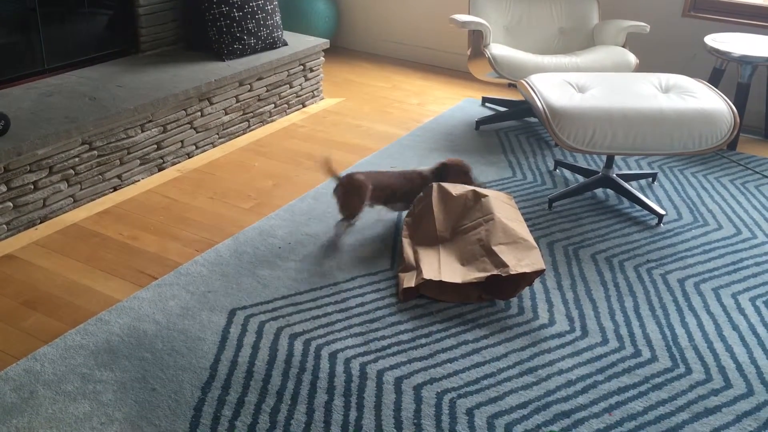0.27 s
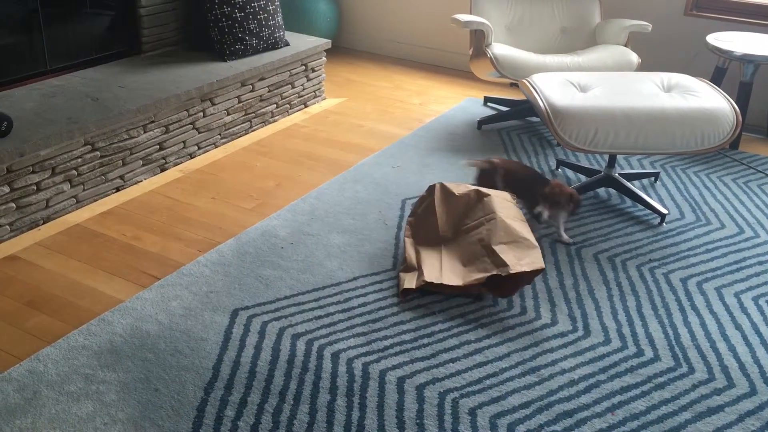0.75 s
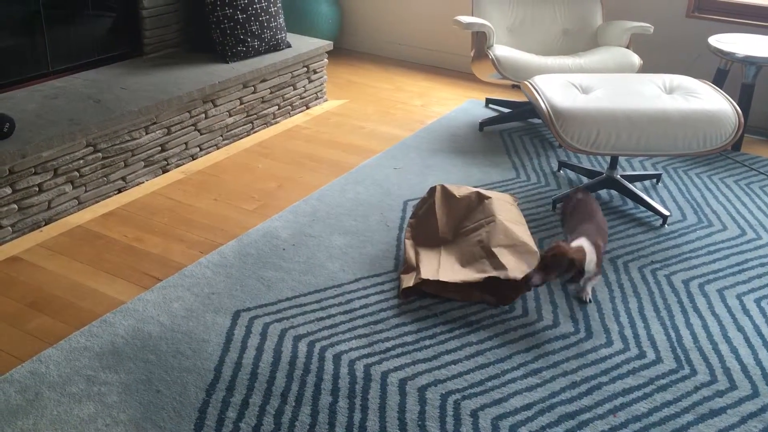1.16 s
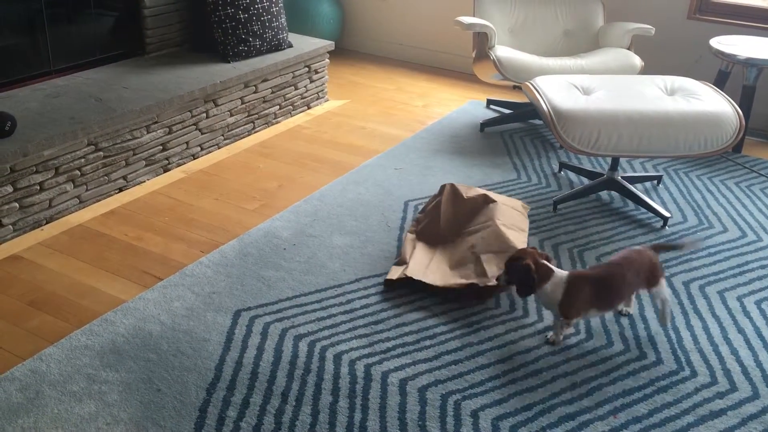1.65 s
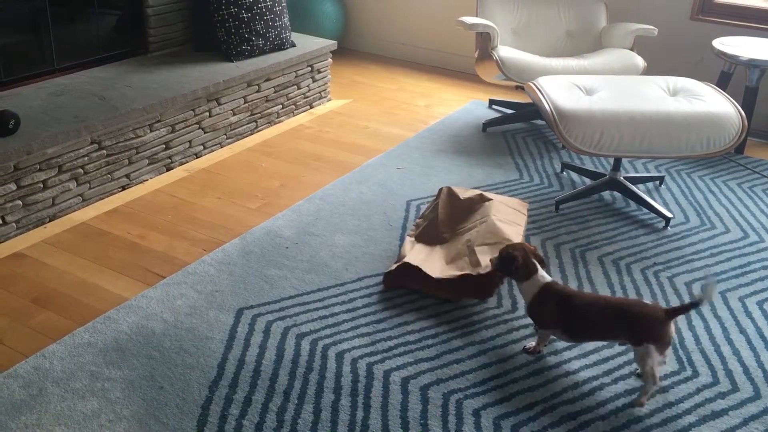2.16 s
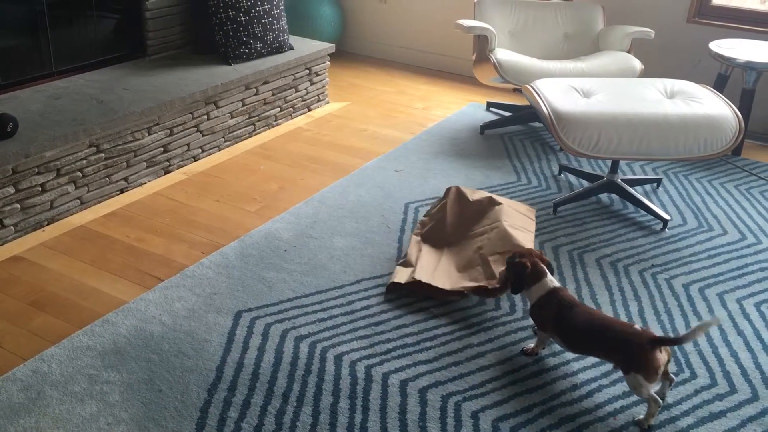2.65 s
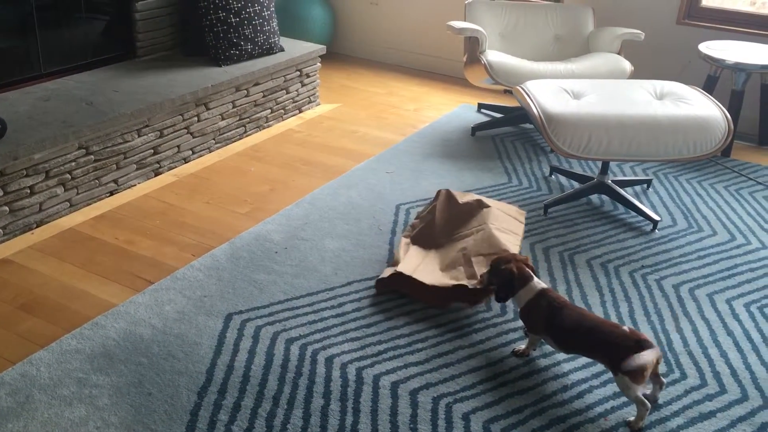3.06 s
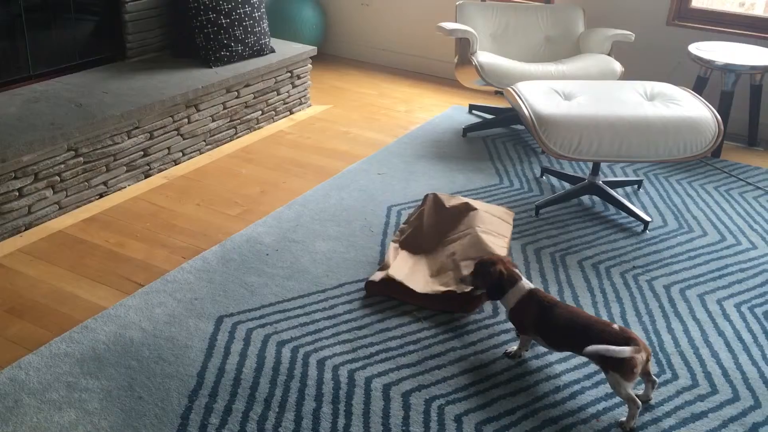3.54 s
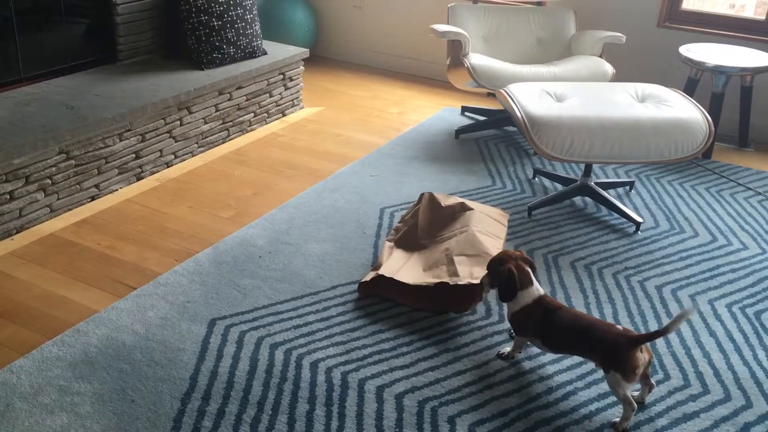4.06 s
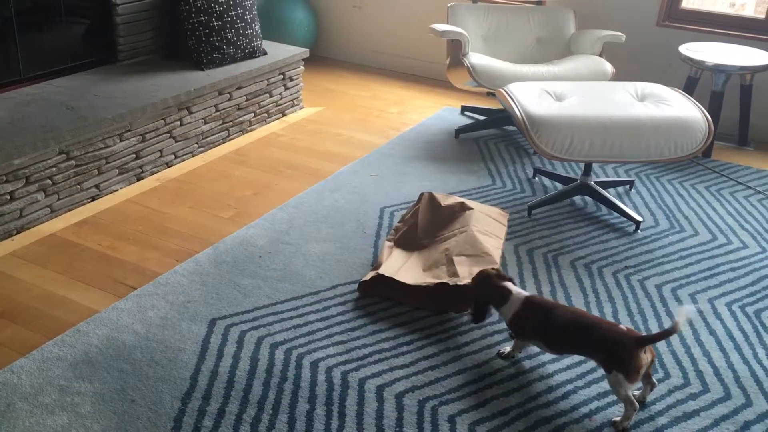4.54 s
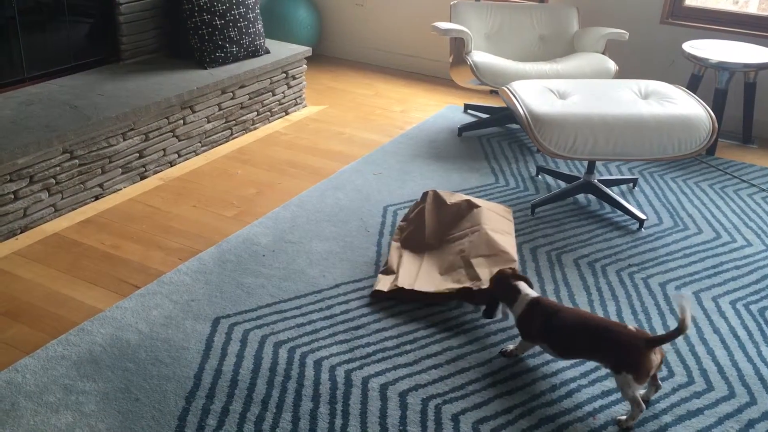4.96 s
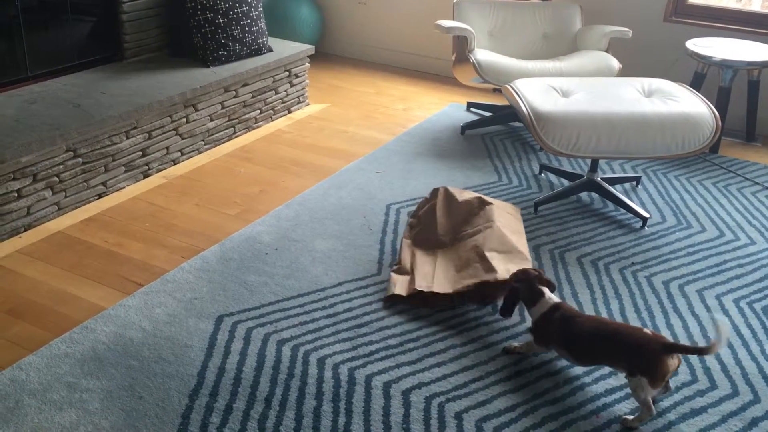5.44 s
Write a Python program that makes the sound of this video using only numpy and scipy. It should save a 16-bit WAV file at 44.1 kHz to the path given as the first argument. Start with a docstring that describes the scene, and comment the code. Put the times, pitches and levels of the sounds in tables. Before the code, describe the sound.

A quiet, resonant living room heard through one microphone a few metres away, with faint low room tone and the dying ring of an earlier yap. From 0.1 to 0.4 s a puppy gives tiny nose whistles and soft panting puffs, with a small paper tick at 0.2. At 0.4 s comes one piercing yap, about a tenth of a second, nearly a pure squeal around 1.9 kHz, roughening and dropping at its end; its echo lasts over a second. Soft paw scuffs follow, then a thin rising nasal whistle and sniff at 1.1-1.2 s. Paper snaps sharply at 1.25 and 1.43, then crinkles, rustles and pops irregularly from 1.8 to 3.5, brighter and busier near 3.3-3.45, over dull floor bumps. It nearly rests from 3.7 to 4.6 s. A thump and light crackle come at 4.7, rustling at 5.1, then the loudest crisp crunches at 5.33 and 5.57 s.

```python
"""Puppy and paper bag

A puppy pants, yaps once, scuffs along, whistles and sniffs, then nudges and bites a paper bag on a rug.
The yap is a stack of partials, the whistles are gliding tones; panting, scuffs and rustle are shaped noise.
Snapping creases are short bursts that ring the paper; bumps on the floor are swells of low noise.
The large hard-walled living room rings for over a second; the tail of an earlier yap is dying away."""
import sys
import numpy as np
from scipy import signal
from scipy.fft import rfft, irfft, next_fast_len
from scipy.io import wavfile
from scipy.ndimage import uniform_filter1d

SR = 44100
rng = np.random.default_rng(int(sys.argv[2]) if len(sys.argv) > 2 else 0)


def wav_record(signal):
    """Record a signal, one row per channel, as 16-bit PCM in the file named by sys.argv[1]."""
    frames = np.transpose(np.atleast_2d(signal))
    bounded = np.clip(frames, -1, 1)
    # unit amplitude maps onto the largest positive 16-bit level
    quanta = np.round(bounded * 32767).astype(np.int16)
    wavfile.write(sys.argv[1], SR, quanta)


def rack_gain(trim_db):
    """Turn a fader trim in dB into the linear factor to multiply a signal by."""
    fader = np.asarray(trim_db, float)
    return 10 ** (fader / 20)


N = 251357
TIME = np.arange(N) / SR

# Partials of a past yap still ringing. Each row: pitch in Hz, width in Hz, level at the start in dB.
RINGING_PARTIALS = [(1830, 90, -64), (890, 130, -60.5), (1680, 57, -57)]
# Spectrum of the quiet room. Each row: frequency in Hz, relative density in dB per Hz.
AIR_SPECTRUM = [(15, -43.5), (25, -19), (43, -3), (92, -5.5), (127, -2), (185, -37), (301, -16),
                (451, -19.5), (2480, -33.5), (2840, -32), (10400, -38.5), (12500, -38), (16000, -35.5)]
# Paws and bag bumping the floor. Each row: peak time in seconds, level in dB, time to rise 15 dB in seconds,
# extra level of the deep boom of the boards in dB.
FLOOR_BUMPS = [(0.279, -57, 0.29, 14), (0.719, -53.5, 0.35, 7), (1.289, -50, 0.052, 0.5),
               (1.55, -53, 0.57, -5), (1.81, -44, 0.022, -5), (2.2, -50.5, 0.14, -2),
               (2.5, -49, 0.075, -14), (3.02, -55, 0.26, 8.5), (3.3, -51.5, 0.23, -5), (3.6, -60, 0.11, 14),
               (4.055, -60, 0.017, -11), (4.731, -43.5, 0.015, -1.5), (5.15, -51, .1, -5.5),
               (5.345, -47, 0.091, -1), (5.619, -47, 0.13, -7)]
# Spectrum of a floor bump. Each row: frequency in Hz, relative density in dB per Hz.
THUD_SPECTRUM = [(18, -26), (30, -19), (49, 8.5), (86, 7.5), (123, 7.5), (281, 8.5), (500, -14.5),
                 (650, -34), (1100, -120)]
# Nose whistles. Each row: start in seconds, length in seconds, starting pitch in Hz, glide in Hz per second,
# fundamental level in dB, octave level in dB.
NOSE_WHISTLES = [(0.103, .06, 5120, -500, -69.5, -58.5), (0.214, .012, 5800, -60000, -51, -61.5),
                 (.222, .03, 4850, -2000, -67.5, -53.5), (1.1, 0.048, 4980, 10987, -46.5, -62),
                 (1.152, 0.039, 5560, -1000, -53.5, -35.5), (1.174, 0.047, 5940, -33000, -51.5, -45)]
# Breath before the yap. Each row: time in seconds, level in dB.
PANT_CONTOUR = [(.12, -76.5), (.17, -61), (.22, -50), (.3, -65), (.36, -65), (.4, -49.5), (.41, -82)]
# Colour of breath through the open mouth. Each row: frequency in Hz, relative density in dB per Hz.
MOUTH_SPECTRUM = [(290, -41.5), (500, -11.5), (665, -22.5), (859, -15.5), (1650, -5.5), (4350, -22.5),
                  (5310, -12), (7360, -38.5), (9790, -17.5), (15000, -37.5)]
# Creases snapping. Each row: time in seconds, peak of the crack in dB, panel pitch in Hz,
# treble lift from 6 kHz up in dB, decay time of the crackle in ms.
CREASE_SNAPS = [(0.2142, -35, 1660, 8, 4.4), (1.2504, -26, 2083, 3, 1.9), (1.2609, -34, 2030, 6, 8.9),
                (1.4339, -27.5, 1680, -5.5, 2.6), (1.7609, -34.5, 1170, -23, 4.6),
                (1.8028, -29, 1260, 1, 6.8), (1.8138, -27, 407, -14, 4.75), (1.8386, -34, 1070, 1, 5.6),
                (2.084, -34.5, 676, -6.5, 6), (2.1621, -32.5, 1330, -2, 5.3), (2.204, -30, 810, 6.5, 4.1),
                (2.3805, -35.5, 727, -2.5, 6.5), (2.4447, -38, 810, -11, 4.8),
                (2.4716, -32.5, 1470, 1, 6.7), (2.514, -26.5, 1260, 2.5, 3.43),
                (2.5261, -32.5, 1800, 3, 5.4), (2.7209, -32, 1800, 5, 4.9), (2.734, -34.5, 1080, -5, 4.4),
                (2.751, -33, 900, -5, 5.5), (2.802, -35, 1390, -11, 2.9), (2.9401, -29, 1250, 2.5, 6.6),
                (2.9886, -35.5, 1960, 6, 4), (3.0469, -34, 910, -6.5, 7.2), (3.1092, -31, 1164, 1, 4.7),
                (3.1377, -34.5, 1210, -1, 4.7), (3.2582, -35.5, 1300, -4, 7.6),
                (3.2912, -32.5, 1460, 24, 2.3), (3.3136, -36, 5830, 23.5, 1.8),
                (3.3633, -27.5, 1290, 19, 2.4), (3.373, -35, 1290, 16, 2.1), (3.426, -24.5, 1350, 1, 2.3),
                (3.4518, -35, 1200, 10, 3.2), (3.6993, -36, 1750, 4, 3.4), (4.6769, -42.5, 630, -18, 5.5),
                (4.722, -34.5, 720, -32, 8.7), (4.7509, -39, 1196, 21.5, 4.2), (4.8099, -36, 738, 18, 4.1),
                (5.0813, -36, 845, -6, 8.4), (5.1256, -38, 1010, 0, 4.3), (5.151, -33.5, 1160, -21, 10.3),
                (5.219, -39.5, 1680, 22, 9.1), (5.3214, -28.5, 644, -8, 10.6),
                (5.3314, -23.5, 955, 11.5, 5.1), (5.3474, -28.5, 1000, 10, 3.4),
                (5.4386, -29, 1130, 8, 2.4), (5.5562, -27, 3440, 25, 12), (5.5744, -23, 1820, 2, 4.3),
                (5.5957, -25.5, 840, 4.5, 7.9)]
# Colour of the paper. Each row: frequency in Hz, relative density in dB per Hz.
PAPER_SPECTRUM = [(88, -29), (150, -4.5), (328, -4.5), (439, -4.5), (1260, -6.5), (2650, -11.5),
                  (3220, -5.5), (4760, -13.5), (6020, -14.5), (13400, -30.5), (16000, -31)]
# Resonances of the air inside the bag. Each row: frequency in Hz, width in Hz, relative level in dB.
BAG_HOLLOW = [(321, 32, 2), (130, 12, -1)]
# The yap's course. Each row: time in seconds, pitch in Hz, effort (its level) in dB.
YAP_CONTOUR = [(.403, 1830, -38.5), (.407, 1804, -15.5), (.413, 1890, -9), (.43, 1907, -7),
               (.445, 1903, -5.5), (.456, 1990, -8), (.47, 1974, -16), (.48, 2008, -17.5),
               (.488, 1767, -19), (.505, 1650, -51.5)]
# Level of the yap's partials by frequency. Each row: frequency in Hz, gain in dB.
THROAT_GAIN = [(900, -5), (1900, -1), (2850, -14.5), (3800, -13), (5700, -27.5), (7600, -53), (9500, -38),
               (11400, -43), (13300, -43)]
# Soft scuffing of running paws, a short sniff, then the bag nudged, dragged or bitten.
# Each row: start of full level in seconds, hold in seconds, level in dB before the rustle's common lift,
# brightness in dB per octave.
SCUFFS_AND_NUDGES = [(0.518, .33, -70, -2.5), (1.112, .04, -64, 1), (1.161, 0.12, -56, 1.5),
                     (1.336, 0.16, -59.5, 5), (1.556, .18, -59.5, 1), (1.808, 0.089, -57.5, 0),
                     (2.06, 0.034, -65.5, 3), (2.164, 0.041, -55.5, 0.5), (2.45, 0.033, -60.5, -2.5),
                     (2.53, 0.028, -54.5, 0), (2.674, .06, -59, 3.5), (2.917, .2, -61.5, -2),
                     (3.29, 0.177, -55.5, 0.5), (3.601, .12, -68.5, -3), (4.583, .14, -69.5, 1.5),
                     (4.746, 0.086, -58.5, 0), (5.051, .05, -67, 2), (5.136, 0.17, -59.5, 2),
                     (5.333, 0.024, -50.5, -0.5), (5.42, .03, -86, -1), (5.566, 0.024, -50.5, 1),
                     (5.63, 0.085, -57, 4)]
# Echo by band. Each row: frequency in Hz, time to die by 60 dB in seconds,
# echo level in dB before each source's own echo setting.
ROOM_BANDS = [(101.4, 0.29, -1), (300, 1.3, 1), (859, 1.41, -0.5), (1960, 1.426, 1), (3626, 0.97, -8),
              (6600, 0.84, -9.5), (11000, 1.3, -15)]


def evened(x):
    """Scales to rms 1."""
    return x / np.sqrt(np.mean(x ** 2) + 1e-20)


def read(points, hz):
    """Looks a spectrum up on a log-frequency axis."""
    f, value = np.transpose(points)
    return np.interp(np.log(hz + 1), np.log(f + 1), value)


def add(mix, s, sound):
    """Mixes a sound in at s seconds."""
    part = mix[round(s * SR):][:len(sound)]
    part += sound[:len(part)]


def coloured(x, points):
    """Filters by a spectrum given in dB."""
    size = next_fast_len(len(x))
    gain = rack_gain(read(points, np.fft.rfftfreq(size, 1 / SR)))
    return irfft(rfft(x, size) * gain, size)[:len(x)]


def unfold(rows):
    """Time and columns of a table, sample by sample."""
    s, *columns = np.transpose(rows)
    t = np.arange(s[0], s[-1], 1 / SR)
    return [t] + [np.interp(t, s, c) for c in columns]


def ring(x, hz, width):
    """One resonance of peak gain 1."""
    return signal.lfilter(*signal.iirpeak(hz, hz / width, SR), x)


def swell(t, start, hold, rise_db_per_s, fall_db_per_s):
    """Gain that rises to 1 at start, holds, and falls, straight in dB."""
    before = np.maximum(start - t, 0)
    after = np.maximum(t - start - hold, 0)
    return rack_gain(-rise_db_per_s * before - fall_db_per_s * after)


def earlier_yap():
    """Narrow bands of noise, the partials of a past yap, fade together as its tail in the room."""
    fade_t60_s = 1.7
    tail = np.zeros(N)
    for hz, width, db in RINGING_PARTIALS:
        partial = ring(ring(rng.standard_normal(N), hz, width), hz, width)
        tail += rack_gain(db - 60 * TIME / fade_t60_s) * evened(partial)
    return tail


def room_air():
    """Steady coloured noise: the quiet of the room."""
    level_db = -63
    return rack_gain(level_db) * evened(coloured(rng.standard_normal(N), AIR_SPECTRUM))


def thumps():
    """Soft low bumps through rug and floorboards over a faint rumble; some reach deeper than others."""
    rise_db, fall_db_per_s, rest_db, deep_hz = 15, 68.5, -71.5, 110
    lumps = rack_gain(2 * evened(uniform_filter1d(rng.standard_normal(N), 1500)))
    thud = evened(coloured(lumps * rng.standard_normal(N), THUD_SPECTRUM))
    deep = signal.filtfilt(*signal.butter(2, deep_hz, fs=SR), thud)
    bumps = np.array([swell(TIME, s, 0, rise_db / rise_s, fall_db_per_s) ** 2
                      for s, _, rise_s, _ in FLOOR_BUMPS])
    _, db, _, deep_db = np.transpose(FLOOR_BUMPS)
    rest = rack_gain(rest_db) ** 2
    # overlapping bumps add as power
    upper_gain = np.sqrt(rack_gain(db) ** 2 @ bumps + rest)
    deep_gain = np.sqrt(rack_gain(db + deep_db) ** 2 @ bumps + rest)
    return upper_gain * (thud - deep) + deep_gain * deep


def whistle(start, length, hz, glide, low_db, high_db):
    """Air through a narrowed nostril: a thin, wobbling, gliding tone and its octave under one arch."""
    wobble_hz, arch_power = 40, 1.9  # a higher power softens the ends
    t = np.arange(0, length, 1 / SR)
    slow_noise = uniform_filter1d(uniform_filter1d(rng.standard_normal(SR // 10), 150), 150)
    wobble = evened(slow_noise)[:len(t)]
    phase = 2 * np.pi * np.cumsum(hz + glide * t + wobble_hz * wobble) / SR
    arch = abs(np.sin(np.pi * t / length)) ** arch_power
    tones = rack_gain(low_db) * np.sin(phase) + rack_gain(high_db) * np.sin(2 * phase)
    return start, np.sqrt(2) * arch * tones


def pant():
    """Hissing breath through the open mouth: noise in the mouth's colour."""
    t, level_db = unfold(PANT_CONTOUR)
    return t[0], rack_gain(level_db) * evened(coloured(rng.standard_normal(len(t)), MOUTH_SPECTRUM))


def snap(s, peak_db, panel_hz, treble_db, ms):
    """A crease buckles: a tick (sharper when short), uneven crackle, a panel ring and a hollow boom."""
    boom_db, boom_db_per_ms = -10, 2.26  # slower creases push more air
    ring_db, ring_db_ms = -3, 34  # the shorter the crease, the louder its panel rings
    lead = 400  # samples of room ahead of the burst for the filters
    noise = rng.standard_normal(2048)
    t = np.arange(len(noise)) / SR
    uneven = rack_gain(0.57 * evened(uniform_filter1d(noise[::-1], 30)))
    tick = (2.9 / ms) ** 2 * t / 0.000077 * np.exp(-t / 0.00014)
    crackle = noise * uneven * (1 - np.exp(-t / .0004)) * np.exp(-t * 1000 / ms)
    crack = coloured(np.pad(tick + crackle, (lead, 2000)), PAPER_SPECTRUM)
    boom = sum(rack_gain(db + boom_db + boom_db_per_ms * ms) * ring(crack, hz, width)
               for hz, width, db in BAG_HOLLOW)
    crack = crack + rack_gain(ring_db + ring_db_ms / ms) * ring(crack, panel_hz, panel_hz / 1.9)
    crack = coloured(crack, [(350, -2.5), (900, 2), (2500, 3.5), (6000, treble_db)])
    return s - lead / SR, rack_gain(peak_db) * (crack + boom) / abs(crack).max()


def yap():
    """A nearly pure squeal; a half-pitch voice grows beneath it, and breath roughens the end."""
    half_start_db, half_full_db, half_grow_s = -56, -22.5, 0.04
    breath_db, breath_top_s, breath_hold_s, breath_rise, breath_fall = -37.5, .468, .025, 296, 495.5  # dB per s
    jitter_hz = 18  # the pitch roughens as the breath swells
    # once effort has dropped this far, each higher octave loses extra dB per dB
    dull_per_octave, dull_after_db = 1.1, 7
    after = SR // 10  # samples left for the breath to die
    t, hz, effort_db = unfold(YAP_CONTOUR)
    half_db = half_start_db + (half_full_db - half_start_db) * np.minimum((t - t[0]) / half_grow_s, 1)
    breath_t = t[0] + np.arange(len(t) + after) / SR
    puff = swell(breath_t, breath_top_s, breath_hold_s, breath_rise, breath_fall)
    jitter = evened(uniform_filter1d(rng.standard_normal(SR // 5), 40))[:len(t)]
    half_phase = np.pi * np.cumsum(hz + jitter_hz * puff[:len(t)] * jitter) / SR
    dull_db = dull_per_octave * np.minimum(effort_db - effort_db.max() + dull_after_db, 0)
    voice = np.zeros(len(t))
    for k in range(1, 15):  # multiples of half the pitch; the odd ones are the half-pitch voice
        level_db = read(THROAT_GAIN, k * hz / 2) + (k % 2) * half_db + dull_db * max(np.log2(k / 2), 0)
        voice += rack_gain(level_db) * np.cos(k * half_phase)
    voice = np.pad(np.sqrt(2) * rack_gain(effort_db) * voice, (0, after))
    hiss = coloured(rng.standard_normal(len(voice)), [(500, -10.0), (3000, -9.5), (5000, -9.0),
                                                      (6300, 2.5), (7500, -5.0), (15000, -12.0)])
    return t[0], voice + rack_gain(breath_db) * puff * evened(hiss)


def scuffs_and_rustle():
    """Grainy, clumped hiss shared by scuffing paws, a sniff and rubbed paper, each with its own brightness."""
    clump_db, patch_db, lift_db = 1.3, 1.8, 7  # unevenness in time, unevenness of colour, common lift
    rise_db_per_s, fall_db_per_s = 697, 151.5
    clumps = rack_gain(clump_db * evened(uniform_filter1d(rng.standard_normal(N), 600)))
    sizes = rack_gain(1.7 * np.minimum(rng.exponential(1, N), 5))
    grains = sizes * (rng.random(N) < 1500 / SR)  # about 1500 tiny creases a second
    grains = signal.oaconvolve(grains, np.exp(-np.arange(300) / 50))[:N]
    hiss = coloured(rng.standard_normal(N) * clumps * (2.1 + evened(grains)), PAPER_SPECTRUM)
    hz, t, z = signal.stft(evened(hiss), SR, nperseg=256)
    octaves = np.log2(np.clip(hz, 300, 16000) / 6800)[:, None]
    # small patches of time and frequency differ in level
    patches = uniform_filter1d(uniform_filter1d(rng.standard_normal(z.shape), 10, 0), 3, 1)
    power = sum((rack_gain(db + bright * octaves) * swell(t, s, hold, rise_db_per_s, fall_db_per_s)) ** 2
                for s, hold, db, bright in SCUFFS_AND_NUDGES)
    shaped = z * np.sqrt(power) * rack_gain(lift_db + patch_db * evened(patches))
    return signal.istft(shaped, SR, nperseg=256)[1][:N]


def room(x, wet_db, build_s):
    """Adds echo: sparse taps of random sign that build up at first, each band dying at its own speed."""
    length, spacing = 2 * SR, 16  # samples
    taps = np.zeros(length)
    at = np.arange(300, length - spacing, spacing)
    taps[at + rng.integers(0, spacing, len(at))] = rng.choice([-1., 1.], len(at))
    taps *= 1 - np.exp(-np.arange(length) / (build_s * SR))
    hz, t, z = signal.stft(taps, SR, nperseg=256)
    band_hz, t60, echo_db = np.transpose(ROOM_BANDS)
    t60 = read(np.c_[band_hz, t60], hz)[:, None]
    echo_db = read(np.c_[band_hz, echo_db], hz)[:, None]
    fall = rack_gain(-60 * t / t60 + echo_db) / np.sqrt(t60)  # long bands are not louder for being long
    tail = signal.istft(z * fall, SR, nperseg=256)[1]
    energy = SR / spacing / (6 * np.log(10))  # of the dying taps, per second of t60
    return x + rack_gain(wet_db) * signal.fftconvolve(x, tail / np.sqrt(energy))[:N]


def scene():
    """Voice, nose, creases and rustle each stir the room by their own amount; the rest is added as is."""
    voice, nose, bag = np.zeros((3, N))
    for row in NOSE_WHISTLES:
        add(nose, *whistle(*row))
    add(nose, *pant())
    for row in CREASE_SNAPS:
        add(bag, *snap(*row))
    add(voice, *yap())
    calls = room(voice, 3, .04) + room(nose, -2, .03)
    touches = room(bag, 3.5, .015) + room(scuffs_and_rustle(), 0.71, .012)
    return (calls + touches + earlier_yap() + thumps() + room_air())[None]


def top_cut(x):
    """Nothing passes above the cut-off."""
    return signal.sosfilt(signal.butter(12, 15900, fs=SR, output="sos"), x)


def record(dry):
    """The input stage rounds off the loudest peaks and blocks the lowest bass."""
    knee, ceiling = .55, .82  # of full scale
    span = ceiling - knee
    over = np.maximum(abs(dry) - knee, 0)
    rounded = np.sign(dry) * (np.minimum(abs(dry), knee) + span * np.tanh(over / span))
    finished = signal.lfilter(*signal.butter(3, 33, "high", fs=SR), rounded)
    return top_cut(finished)


dry = scene()
out = record(dry)
wav_record(out)
```